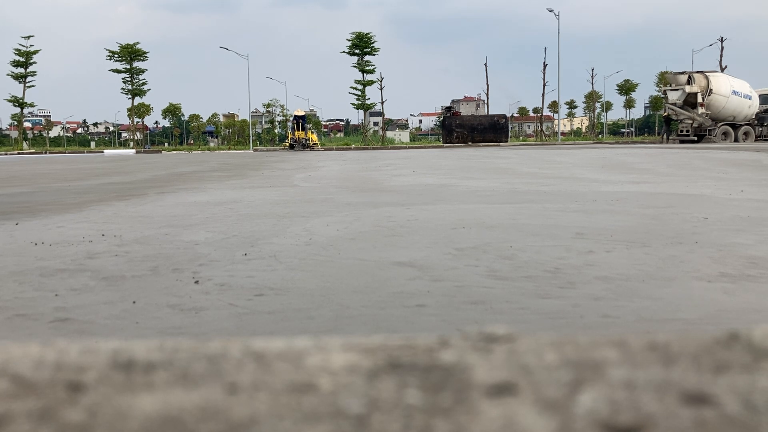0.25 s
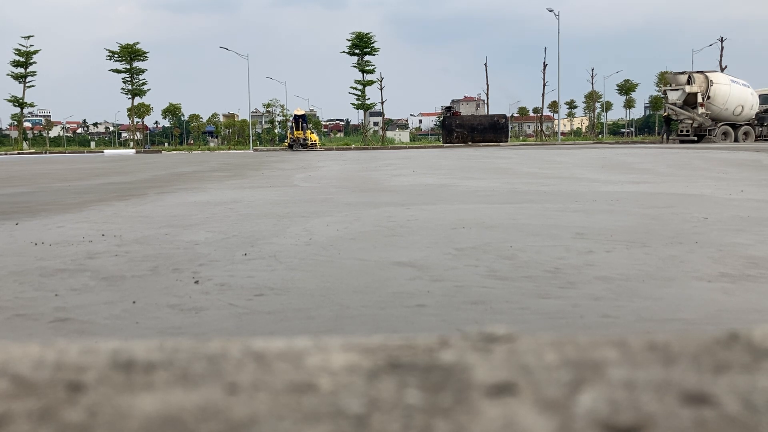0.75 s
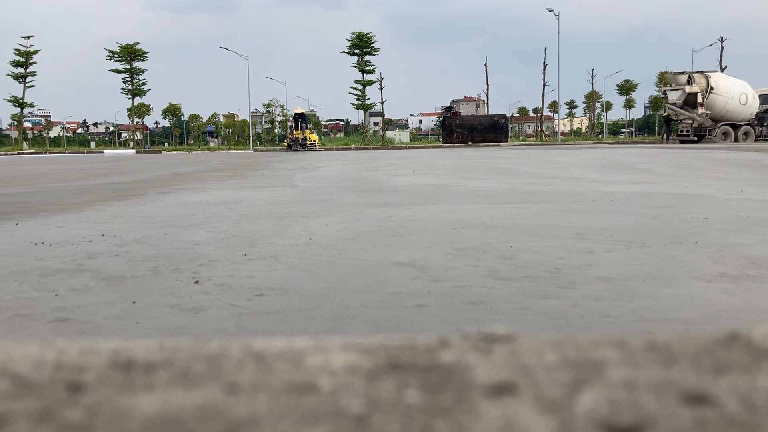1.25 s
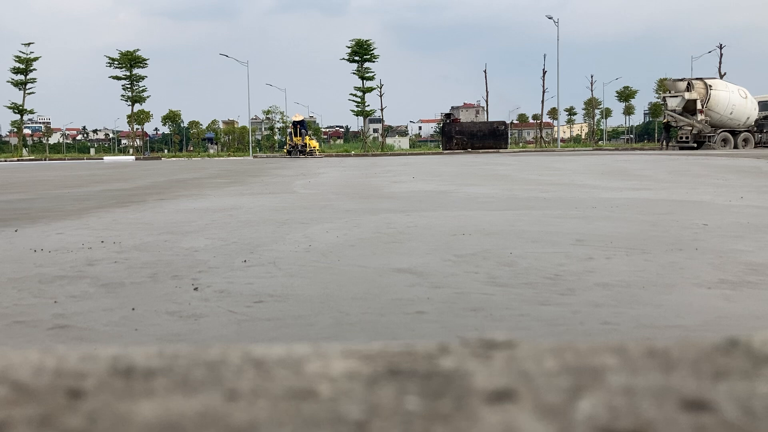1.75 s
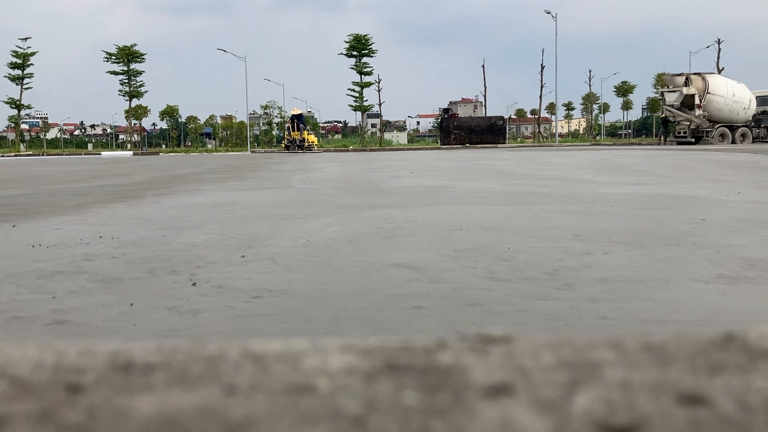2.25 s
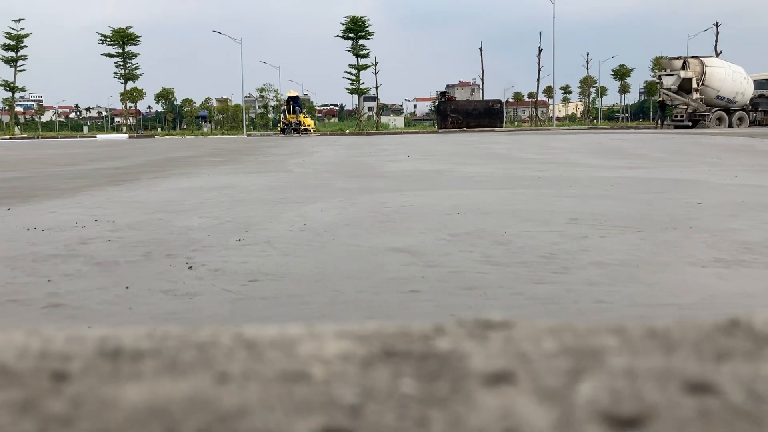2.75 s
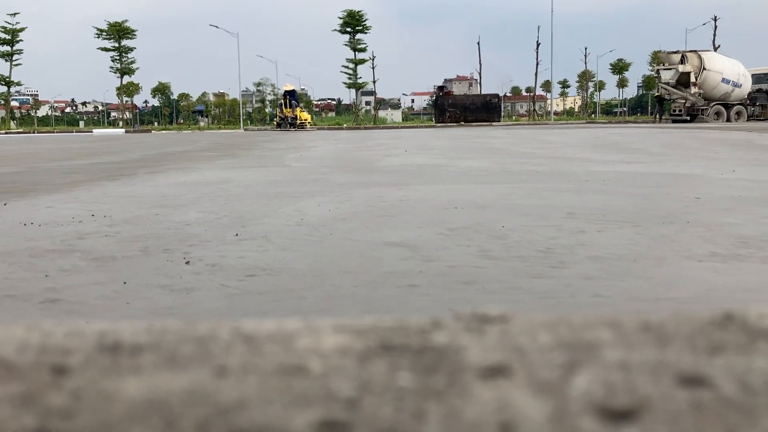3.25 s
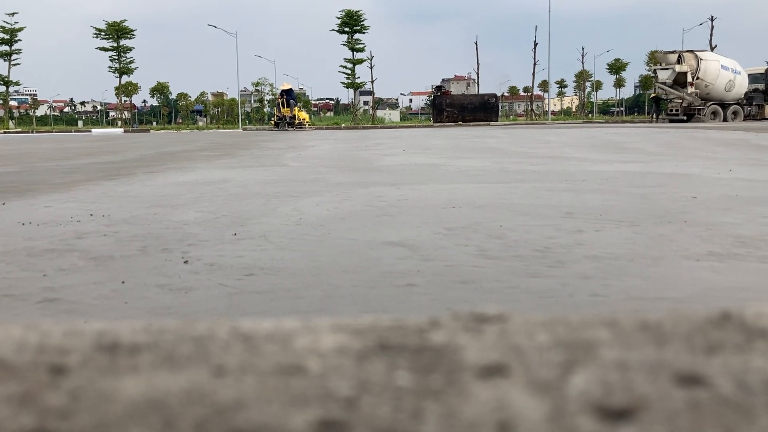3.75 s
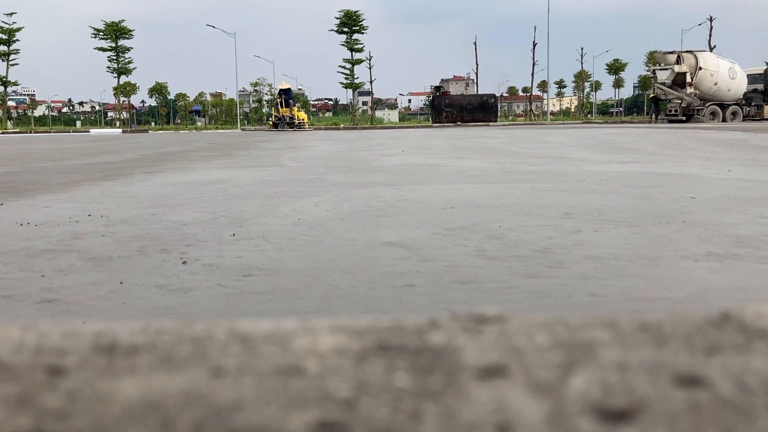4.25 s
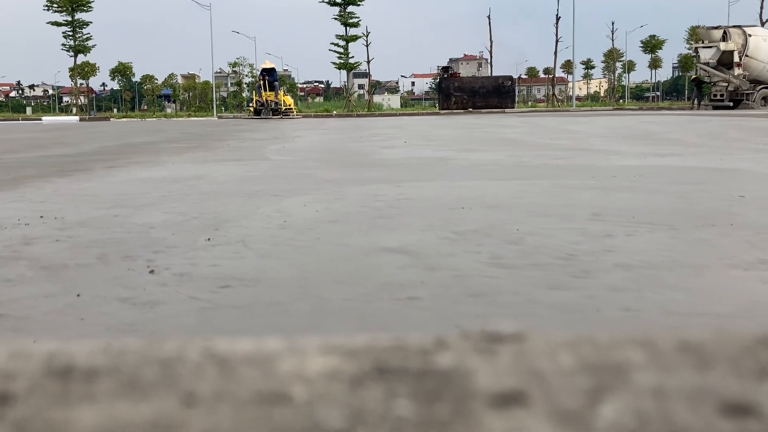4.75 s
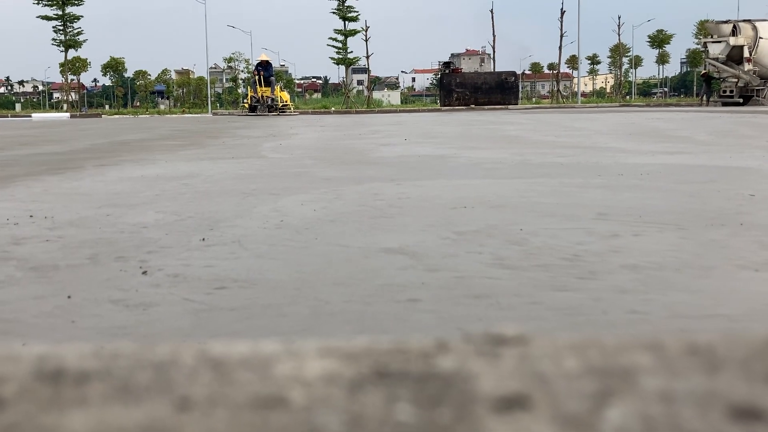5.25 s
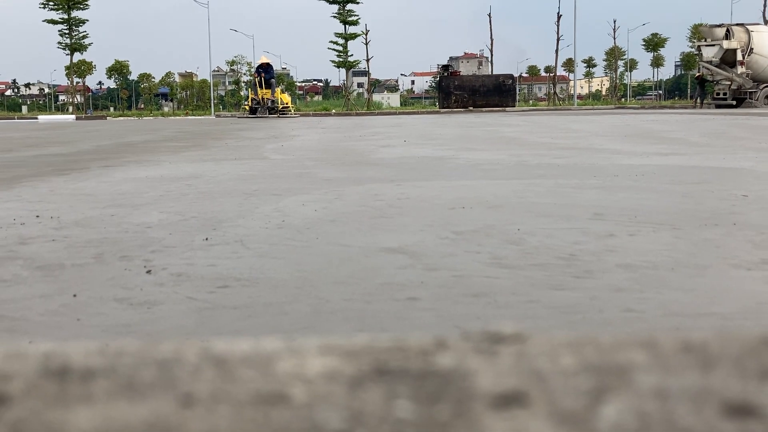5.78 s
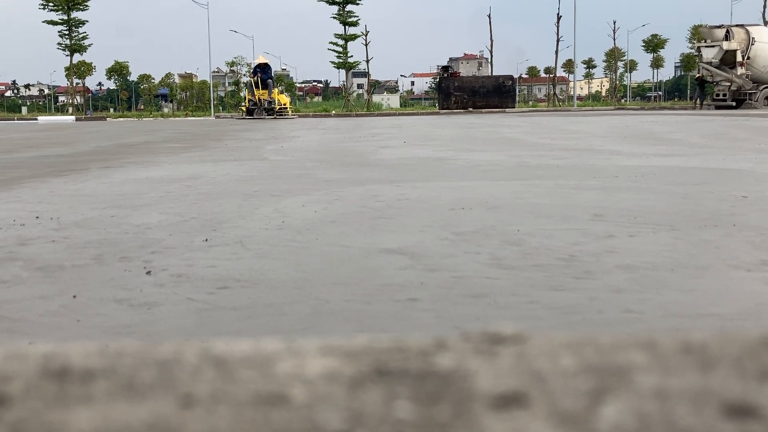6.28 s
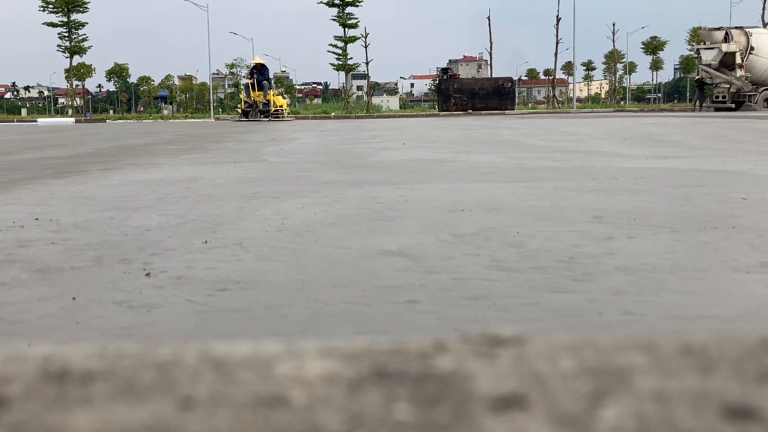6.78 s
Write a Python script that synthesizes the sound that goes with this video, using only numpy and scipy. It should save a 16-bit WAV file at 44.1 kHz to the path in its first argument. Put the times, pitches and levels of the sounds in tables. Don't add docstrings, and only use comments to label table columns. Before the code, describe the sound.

A steady outdoor bed of machines fills all seven seconds, heard at a distance by stereo microphones on the ground. A truck diesel drones under a rushing roar and a mid-pitched pump whine that climbs during the first second, then gently surges about once a second, most widely near 2.9. A slow engine idles low behind. A trowel's twin engine putters at about twenty pulses a second, its blades hissing and ringing brightly on concrete, scraping harder by 1.9. Tiny steel taps begin around 0.7. A boomy slump comes at 1.0, a gritty one at 1.5, and the heaviest at 2.05-2.2 with rattling stones and a brief low clang; taps crowd until 2.9. The tone colour shifts between 1.1 and 2.1. Softer slumps follow at 4.2-4.4, 5.0, 5.5 and 6.6, with scattered taps, especially near 5.9. Trowel and pump speed up at the end.

```python
import sys
import numpy as np
from scipy import signal
from scipy.fft import rfft, irfft, next_fast_len
from scipy.io import wavfile
from scipy.ndimage import uniform_filter1d, map_coordinates

SR = 44100
rng = np.random.default_rng(int(sys.argv[2]) if len(sys.argv) > 2 else 0)


def natural_amplitude(level_db):
    exponent = np.asarray(level_db, float) / 20
    return 10 ** exponent


def dump_mix(stems):
    frames = np.atleast_2d(stems).T
    limited = np.clip(frames, -1, 1)
    pcm = np.round(limited * 32767).astype(np.int16)
    wavfile.write(sys.argv[1], SR, pcm)


N = 309582


def unit(x):
    return x / np.sqrt(np.mean(x ** 2) + 1e-20)


def along(points, hz):
    f, v = np.transpose(points)
    return np.interp(np.log(hz + 1), np.log(f + 1), v)


def over_time(rows):
    s, values = np.transpose(rows)
    return np.interp(np.arange(N) / SR, s, values)


def wobble(rate):
    knots = rng.standard_normal(int(N * rate / SR) + 4)
    return map_coordinates(knots, [np.arange(N) * rate / SR])


def filtered(x, response):
    m = next_fast_len(N + 8192)
    return irfft(rfft(x, m) * response(np.fft.rfftfreq(m, 1 / SR)), m)[..., :N]


def noise(spectrum, patchy_db, gate=1):
    z = signal.stft(rng.standard_normal((2, N)) * gate, nperseg=512)[2]
    patches = uniform_filter1d(rng.standard_normal(z.shape[1:]), size=5, axis=0)
    patches = uniform_filter1d(patches, size=12, axis=1)
    pair = signal.istft(z * natural_amplitude(patchy_db * unit(patches)), nperseg=512)[1][:, :N]
    closed = [(spectrum[0][0] * .5, -120)] + list(spectrum) + [(spectrum[-1][0] * 2, -120)]
    return unit(filtered(pair, lambda hz: natural_amplitude(along(closed, hz))))


def turns(hz):
    return np.cumsum(hz * np.ones(N)) / SR


def tone(cycles, db, flutter_db, blur, rate):
    phase = 2 * np.pi * (cycles + rng.random()) + blur * wobble(rate)
    return np.sqrt(2) * natural_amplitude(db + flutter_db * wobble(rate)) * np.sin(phase)


def throb(cycles, depth, sharp):
    return 1 + depth * (.5 + .5 * np.cos(2 * np.pi * cycles)) ** sharp


def idler():
    # multiple, level_db
    idle_tones = [(2, -54), (3, -46), (4, -47), (5, -51), (6, -52), (7, -51)]
    return sum(tone(k * turns(18), db, flutter_db=1.5, blur=0.83, rate=4) for k, db in idle_tones)


def pump_run():
    # time_s, pitch_hz
    rest = [
        (0, 565),
        (.3, 576.3),
        (.86, 576.7),
        (1.07, 594.2),
        (3.8, 595),
        (5.4, 597.5),
        (7.02, 608),
    ]
    # middle_s, length_s, rise_hz, octave_extra_db
    surges = [
        (0.426, .26, 7, 3),
        (1.2, .42, 3.006, 9.5),
        (1.889, .68, 11, 2),
        (2.871, 1.0, 25, 1),
        (3.6, 0.31, 1.5, 1),
        (4.221, 0.9, 14, 1),
        (5.001, .75, 12, 1.5),
        (5.85, 0.96, 17, -0.5),
        (6.62, 0.79, 10, -2.5),
        (7.1, 0.44, 6, -0.5),
    ]
    t, hz, extra_db = np.arange(N) / SR, over_time(rest), np.zeros(N)
    for middle, length, rise_hz, db in surges:
        hump = np.cos(np.pi * np.clip((t - middle) / length, -.5, .5)) ** 2
        hz = hz + rise_hz * hump
        extra_db = extra_db + db * hump ** 0.29
    return hz, extra_db


def diesel(shaft):
    # multiple of shaft speed, level_db
    shaft_tones = [(2, -58), (3, -37), (4, -53), (5, -54), (6, -44), (9, -49), (12, -54), (15, -56)]
    return sum(tone(k * shaft, db, flutter_db=1.0, blur=0.41, rate=4.4) for k, db in shaft_tones)


def diesel_roar(shaft, pump_hz):
    # pitch_hz, level_db per Hz
    roar_colour = [(400, -46), (650, -10), (770, -9.5), (900, -11), (1100, -5.5), (1450, -3.5), (1650, -13),
                   (1950, -5.5), (2200, -10.5), (2480, -8), (2700, -13), (3400, -12.5), (4200, -18.5),
                   (5000, -22), (6300, -31)]
    roar_db = -37.4 + 0.042 * (pump_hz - 600) + .35 * wobble(9)
    return natural_amplitude(roar_db) * noise(roar_colour, patchy_db=1.1, gate=throb(3 * shaft, depth=.45, sharp=3))


def pump_whine(shaft, pump_hz, extra_db):
    # pump_pitch_hz, level_db
    first_hose = [(564, -37.5), (578, -35.5), (598, -42.5), (620, -42)]
    octave_hose = [(564, -49), (578, -44), (588, -48.5), (594.5, -48), (599, -37), (605, -33), (612, -36),
                   (620, -39.5)]
    lower_hose = [(577, -43), (598, -48.5), (615, -41.5)]
    beside_hose = [(564, -57), (578, -52), (598, -45.5), (620, -43)]
    fourth_hose = [(580, -59), (594, -59), (605, -54), (619, -47.5)]
    sixth_hose = [(565, -66), (577, -60), (590, -73), (600, -75)]

    def passed_db(hose):
        return np.interp(pump_hz, *np.transpose(hose))

    sway_db, sway_rate = 1.3, 5
    first_db = passed_db(first_hose) + sway_db * wobble(sway_rate) - 0.7
    lower_db = passed_db(lower_hose) + sway_db * wobble(sway_rate)
    octave_db, fourth_db = passed_db(octave_hose) + extra_db, passed_db(fourth_hose) + extra_db
    pump = turns(pump_hz)
    whine = tone(pump, first_db, flutter_db=2.5, blur=0.25, rate=22)
    whine *= unit(throb(shaft, depth=0.23, sharp=0.43))
    whine += tone(2 * pump, octave_db, flutter_db=0.87, blur=0.27, rate=25)
    whine += tone(.6525 * pump, lower_db, flutter_db=1.5, blur=.25, rate=18)
    whine += tone(.983 * pump, passed_db(beside_hose), flutter_db=2.5, blur=0.24, rate=16)
    whine += tone(4 * pump, fourth_db, flutter_db=2.2, blur=.4, rate=18)
    whine += tone(6 * pump, passed_db(sixth_hose), flutter_db=2.2, blur=.4, rate=18)
    return whine


def truck():
    pump_hz, extra_db = pump_run()
    shaft = turns(pump_hz) / 27
    return diesel(shaft) + pump_whine(shaft, pump_hz, extra_db), diesel_roar(shaft, pump_hz)


def drum():
    # start_s, boom_db, grit_db, rattle_db, length_s
    slumps = [(1.043, -33, -54, -52, 0.14), (1.486, -48, -37, -54, .04), (2.053, -24.5, -39, -35.5, 0.063),
              (2.083, -36, -57, -49, .025), (2.123, -27, -54, -49, 0.031), (2.17, -33.5, -54, -56, 0.12),
              (4.201, -43, -59, -55, 0.078), (4.4, -34, -43, -54, 0.11), (4.979, -35, -61, -47, .06),
              (5.5, -37, -49, -56, 0.048), (6.62, -37.5, -45, -56, 0.35), (6.969, -39, -56, -60, 0.057)]
    # pitch_hz, level_db per Hz
    boom_colour = [(60, -30), (120, -6), (300, 0), (500, -4), (1000, -8), (2000, -17.5), (4000, -22.5)]
    grit_colour = [(1000, -19), (1900, -4), (2500, 8), (3500, 5), (4500, -16)]
    rattle_colour = [(3500, -26), (5500, -2), (8500, -2), (12000, -11), (15000, -18)]
    t, levels = np.arange(N) / SR, np.zeros((3, N))
    for start, *layers_db, length in slumps:
        u = np.clip(t - start, 0, None) / length * 3.55
        levels += natural_amplitude(np.array(layers_db))[:, None] * u * np.exp(1 - u)
    boom, grit, rattle = levels
    sound = boom * noise(boom_colour, patchy_db=2.5)
    sound += grit * noise(grit_colour, patchy_db=2.1)
    return sound + rattle * noise(rattle_colour, patchy_db=2.5)


def clang():
    # pitch_hz, level_db, time to fade by 60 dB in s
    wall_tones = [(256, -1.5, 0.37), (306.6, 7, 0.21), (320, -9, .15)]
    t = np.clip(np.arange(N) / SR - 2.125, 0, None)
    ring = sum(natural_amplitude(db - 60 * t / fade_s) * np.sin(2 * np.pi * hz * t) for hz, db, fade_s in wall_tones)
    return natural_amplitude(-25.5) * (1 - np.exp(-t / .008)) * ring


def bite():
    # time_s, scrape_db
    bite_points = [(0.0, -52), (0.94, -51), (1.88, -48.5), (3.11, -49), (3.24, -50), (4.24, -48.5),
                   (4.67, -49), (4.98, -48.5), (6.32, -49), (6.61, -48), (7.02, -49)]
    db = over_time(bite_points)
    return db, db - db.mean()


def loose_blade():
    # start_s, low_tones_db, high_tones_db
    hard = np.array([(.732, -50, -45), (.8814, -48, -51), (1.2507, -47, -49), (1.3229, -52, -43.5),
                     (1.6164, -47, -52), (1.7642, -44, -42), (1.8369, -46, -43), (2.2064, -35.5, -51.5),
                     (2.2778, -41, -46), (2.4271, -41, -46.5), (2.4999, -37.5, -48.5), (2.6469, -37.5, -50),
                     (2.7931, -45, -43), (2.9357, -52, -47.5), (3.2319, -53, -44), (3.664, -52, -54),
                     (4.3074, -42, -61), (4.4542, -49, -46), (4.6004, -59, -45), (4.9655, -50, -48),
                     (5.0396, -47, -42), (5.1872, -46.5, -41), (5.2602, -50, -44), (5.7745, -47, -47.5),
                     (5.8505, -42.5, -47), (5.9293, -40.5, -47), (5.9964, -42, -44), (6.5155, -45, -44),
                     (6.5904, -47, -43), (6.9576, -57, -50)])
    # pitch_hz, level_db, time to fade by 60 dB in s
    tap_tones = [(3836, 7.5, 0.068), (3940, -13, 0.036), (4260, 10, 0.016), (4290, 7.5, 0.054),
                 (4260, -8, 0.014), (4470, 1, 0.033)]
    pass_s, scatter_s, scatter_db = .0735, .008, 3.5
    graze_db = (-56, -51)
    gaps = zip(hard[:-1, 0], hard[1:, 0])
    soft = np.concatenate([np.linspace(a, b, round((b - a) / pass_s) + 1)[1:-1] for a, b in gaps])
    chance = rng.standard_normal((len(soft), 3))
    soft = soft + scatter_s * chance[:, 2]
    swing_db = bite()[1][(soft * SR).astype(int), None]
    soft_db = graze_db + scatter_db * chance[:, :2] + .8 * swing_db
    sound, t = np.zeros(N + SR), np.arange(SR // 8) / SR
    for start, low_db, high_db in np.vstack([hard, np.column_stack([soft, soft_db])]):
        ring = np.zeros(len(t))
        for hz, level_db, fade_s in tap_tones:
            hit_db = high_db if hz > 4100 else low_db
            ring += natural_amplitude(level_db + hit_db - 60 * t / fade_s) * np.sin(2 * np.pi * hz * t)
        sound[round(start * SR):][:len(t)] += natural_amplitude(3) * ring * (1 - np.exp(-t / .001))
    return sound[:N]


def trowel_cycles():
    # time_s, rate_hz
    twin = [
        (0, 19),
        (.68, 20),
        (1.2, 19.3),
        (3, 19.95),
        (3.6, 19.7),
        (4.4, 20.5),
        (5.3, 20.45),
        (6.3, 19.5),
        (7.02, 21.6),
    ]
    return turns(over_time(twin))


def exhaust(cycle):
    # multiple of the cycle, level_db
    exhaust_tones = [(2, -54), (3, -52), (4, -44), (5, -38), (6, -49), (7, -43), (8, -41.5), (9, -45),
                     (10, -46.5), (11, -50), (12, -55), (13, -55), (14, -55), (15, -55), (16, -55)]
    puff = 2 * np.pi * cycle + 0.054 * wobble(5)
    sound = np.zeros(N)
    for k, db in exhaust_tones:
        phase = k * puff - 0.0706 * k * k + 0.9 * wobble(5)
        sound += np.sqrt(2) * natural_amplitude(db + 1.2 * wobble(6)) * np.cos(phase)
    return sound


def trowel_drone(cycle):
    # pitch_hz, level_db per Hz
    drone_colour = [(21, -47), (35, -2), (92, -5.5), (167, -4), (254, -9), (398, -3.5), (516, -10.5),
                    (599, -3), (754, -14.5), (900, -8.5), (1170, -19.5), (1980, -120)]
    drone_db = -33.5 + 0.17 * bite()[1]
    return natural_amplitude(drone_db) * noise(drone_colour, patchy_db=1.15, gate=throb(cycle, depth=0.2, sharp=7.6))


def blades(cycle):
    # pitch_hz, level_db per Hz
    scrape_colour = [(2500, -22), (4000, 1.5), (5000, -1), (6000, -2.5), (8000, -1.5), (10000, -4.5),
                     (12500, -7.5), (14000, -15), (15700, -13), (17000, -39)]
    # pitch_hz, width_hz, level_db
    steel_tones = [(4540, 40, 3), (4900, 40, 4), (5060, 40, 3), (5500, 60, 2), (6370, 40, 4), (6850, 50, 1),
                   (7450, 40, 4), (8110, 35, 7), (8420, 45, 5), (9380, 40, 5), (9530, 35, 8), (9750, 40, 3),
                   (10200, 45, 3), (10850, 40, 6), (11400, 40, 3), (11880, 40, 5), (12200, 40, 5),
                   (12450, 40, 6), (13200, 45, 6), (14800, 60, 8)]
    scrape_db, swing_db = bite()
    hiss_gate = throb(2 * cycle, depth=.2, sharp=3) * natural_amplitude(.6 * wobble(12))
    hiss = noise(scrape_colour, patchy_db=1.3, gate=hiss_gate)
    passes = cycle * 2 / 3
    knocks = (.35 + np.exp(-3.5 * ((passes + .3) % 1))) * natural_amplitude(2.2 * wobble(11))

    def steel(hz):
        return sum(natural_amplitude(db) * 1j * hz * w / (c * c - hz * hz + 1j * hz * w) for c, w, db in steel_tones)

    ring = unit(filtered(noise(scrape_colour, patchy_db=5.0, gate=knocks), steel))
    return natural_amplitude(scrape_db + 5) * (hiss + natural_amplitude(-7.5 + 2 * swing_db) * ring)


def ports(direct, spread, lag):
    # pitch_hz, level_db
    tilt = [(60, -4), (200, 0.5), (500, -3.5), (800, -2), (1290, -1), (2380, 3), (3300, 2.5), (4400, -0.5),
            (5800, -2.5), (7000, -0.5), (15000, 0.5)]
    # pitch_hz, likeness (0 to 1)
    alike = [(100, 0.9), (300, 0.95), (775, 0.55), (1400, .95), (3000, 0.62), (4800, 0.86), (6000, 0.78),
             (9000, .98), (12500, .85), (13800, 0.9), (15500, .7)]

    def mid_and_side(hz):
        angle = np.arccos(np.clip(along(alike, hz), -1, 1)) / 2
        return np.array([np.cos(angle), np.sin(angle)])

    def left_and_right(hz):
        half = natural_amplitude(along(tilt, hz) / 2) * np.exp(-.5j * np.interp(hz, *np.transpose(lag)))
        return np.array([half, 1 / half])

    mid, side = filtered(spread, mid_and_side)
    return filtered(np.array([direct + mid + side, direct + mid - side]), left_and_right)


def slab(x):
    # pitch_hz, width_hz, before_db, after_db
    bounce = [(200, 47, -2.5, -0.5), (820, 36, -3, 1.5), (760, 26, 1, -2.5), (1626, 54, 5.5, -2),
              (1790, 61, -3, 1), (2180, 100, -1, 0), (4900, 580, 2, -1.5)]

    def colour(hz):
        return natural_amplitude(sum(np.outer(db, np.exp(-.5 * ((hz - c) / w) ** 2)) for c, w, *db in bounce))[:, None]

    before, after = filtered(x, colour)
    return before + (after - before) * np.interp(np.arange(N) / SR, (1.1, 2.1), (0, 1))


def scene():
    # pitch_hz, lag in radians
    truck_lag = [(0, 0), (690, .8), (2070, 1.2), (3400, 3.1), (4100, 3.8), (5500, 3.9), (7150, 6.28)]
    trowel_lag = [(0, 0), (690, .8), (2070, 1.1), (3300, 3.1), (3900, 3.7), (4550, 3.15), (5250, 3.25),
                  (7150, 6.28), (8700, 9.1), (9500, 9.7), (11300, 12.57), (12800, 15.5), (14400, 15.9),
                  (15300, 18.85)]
    tap_lag = [(0, 0), (3850, 4.65), (4300, 4), (9100, 9.42)]
    truck_tones, roar = truck()
    cycle = trowel_cycles()
    rush = trowel_drone(cycle) + blades(cycle) + drum()
    heard = ports(truck_tones + idler(), roar, truck_lag)
    heard += ports(exhaust(cycle) + clang(), rush, trowel_lag)
    heard += ports(loose_blade(), np.zeros((2, N)), tap_lag)
    return slab(heard)


def low_pass(x):
    return signal.sosfilt(signal.butter(12, 17130, fs=SR, output="sos"), x)


def record(dry):
    def band(hz):
        return (hz < 15770) / np.sqrt(1 + (58 / (hz + 1)) ** 4)

    return low_pass(filtered(dry, band))


dry = scene()
out = record(dry)
dump_mix(out)
```